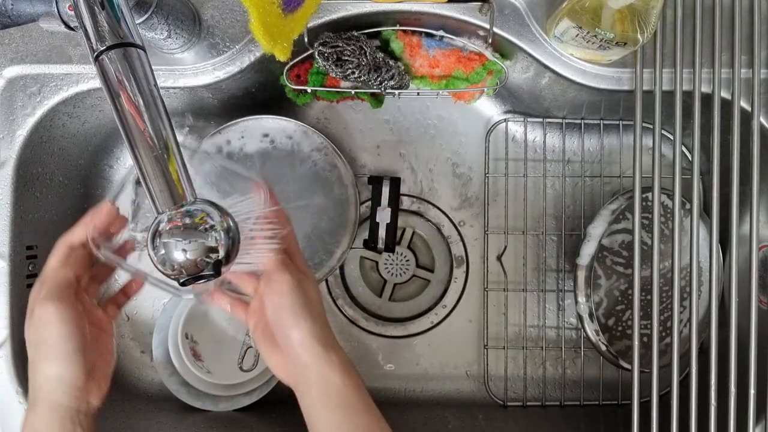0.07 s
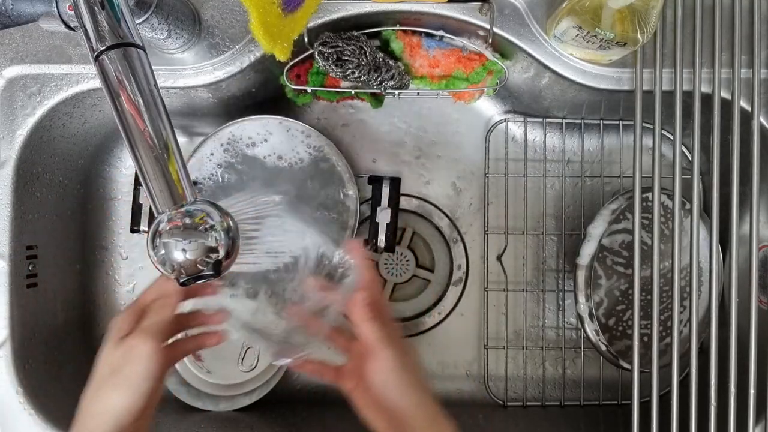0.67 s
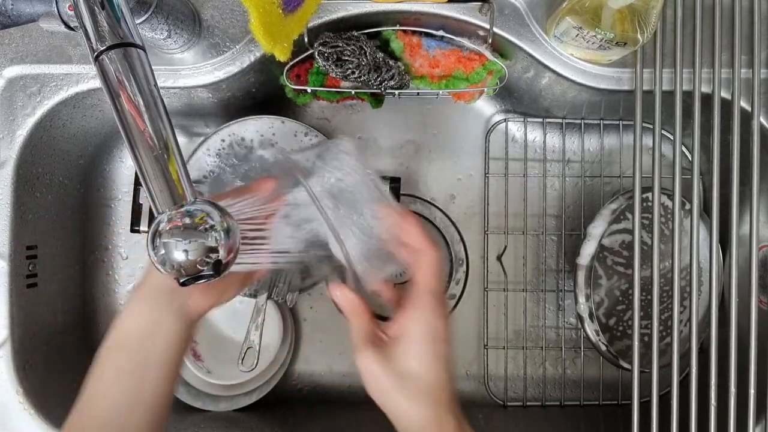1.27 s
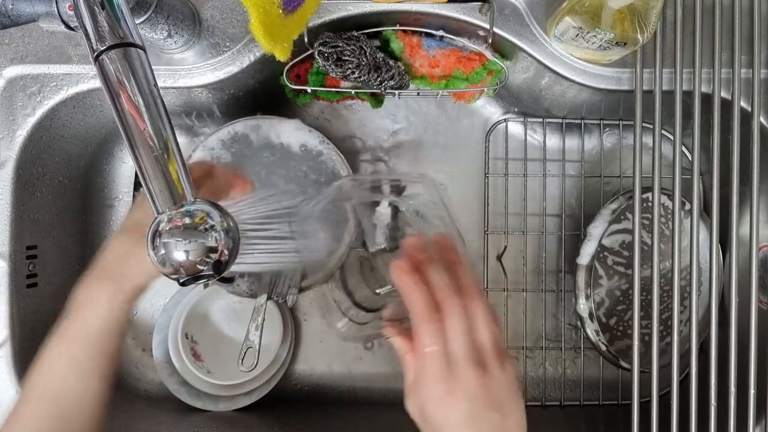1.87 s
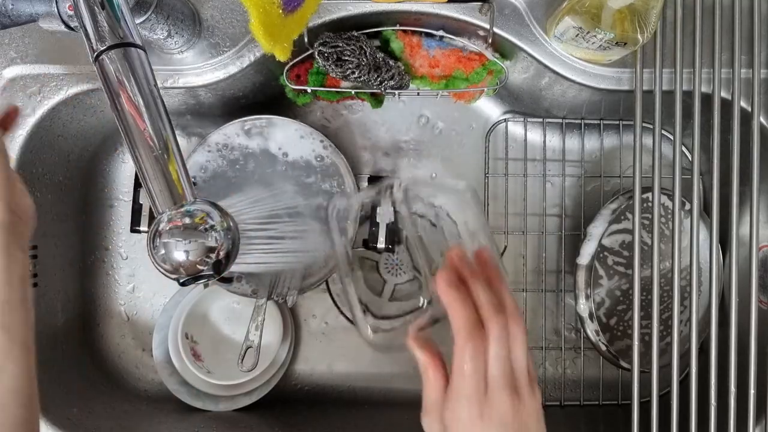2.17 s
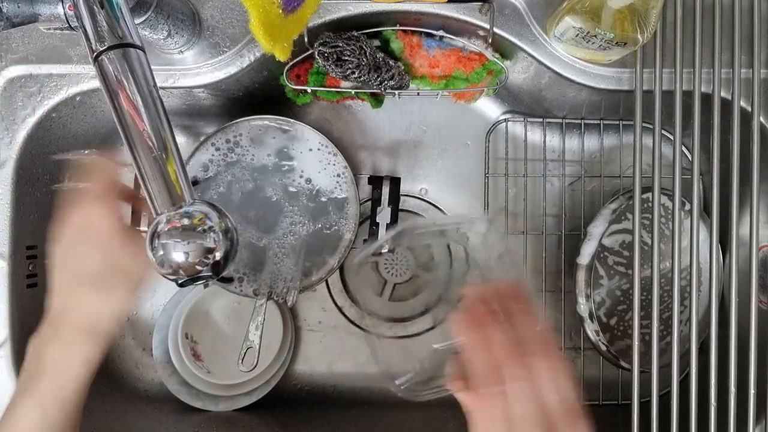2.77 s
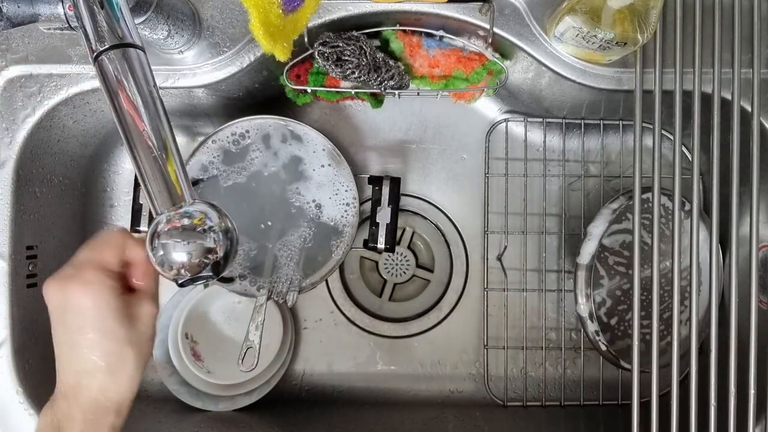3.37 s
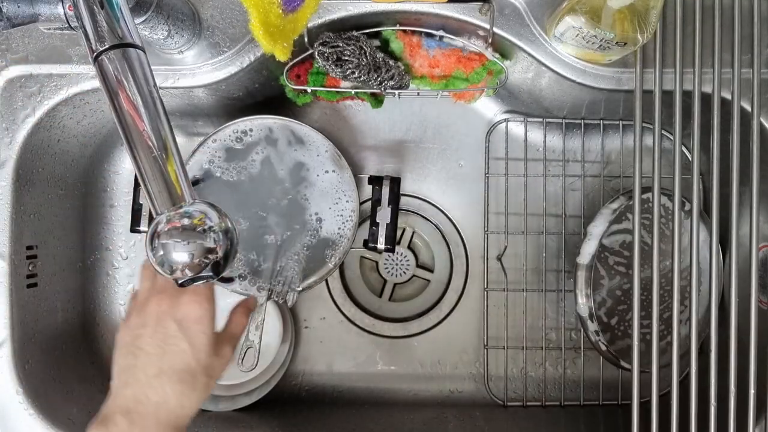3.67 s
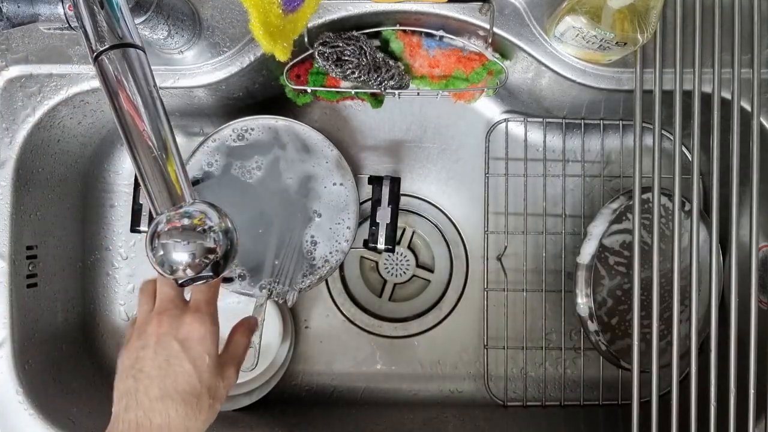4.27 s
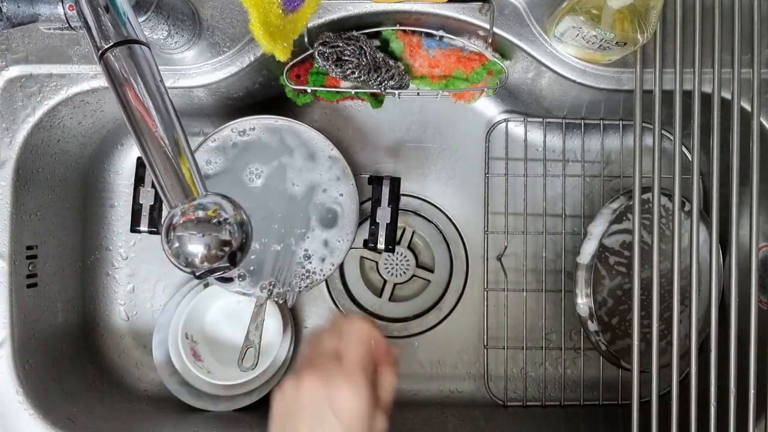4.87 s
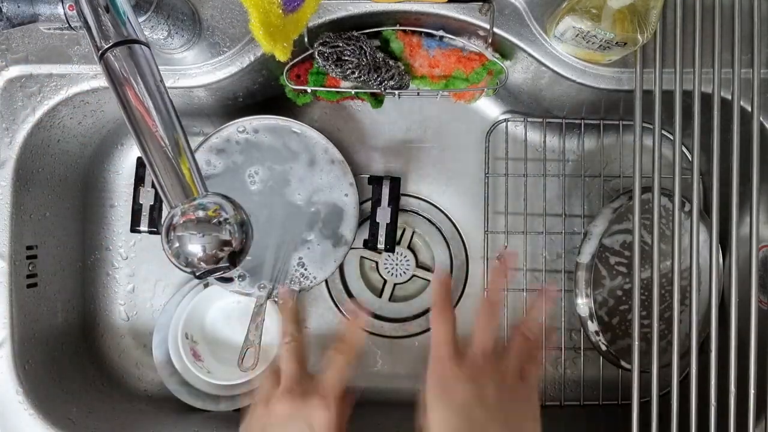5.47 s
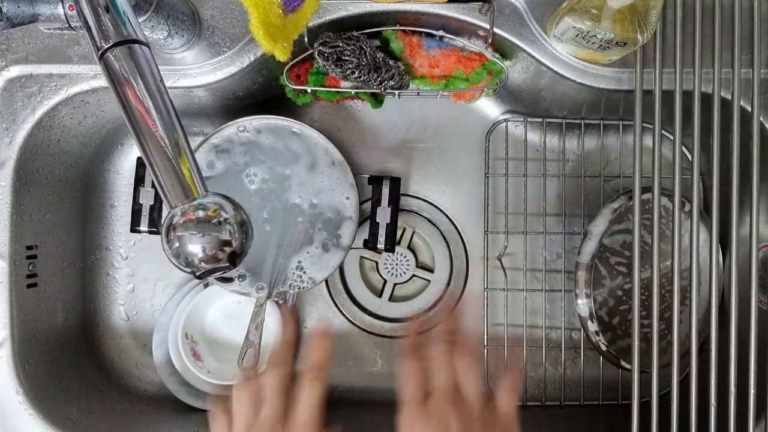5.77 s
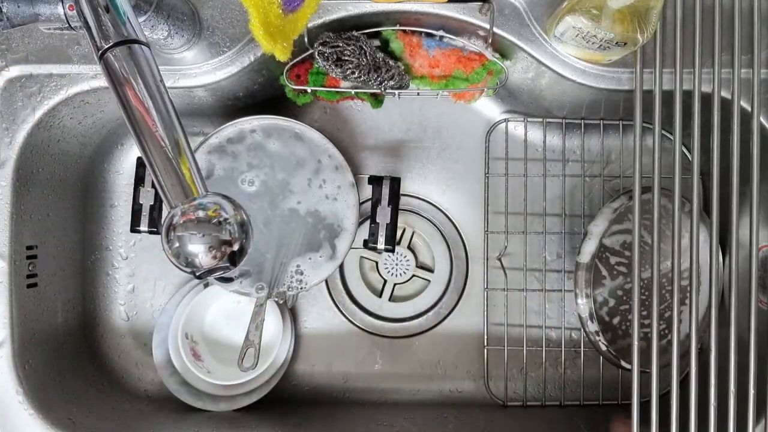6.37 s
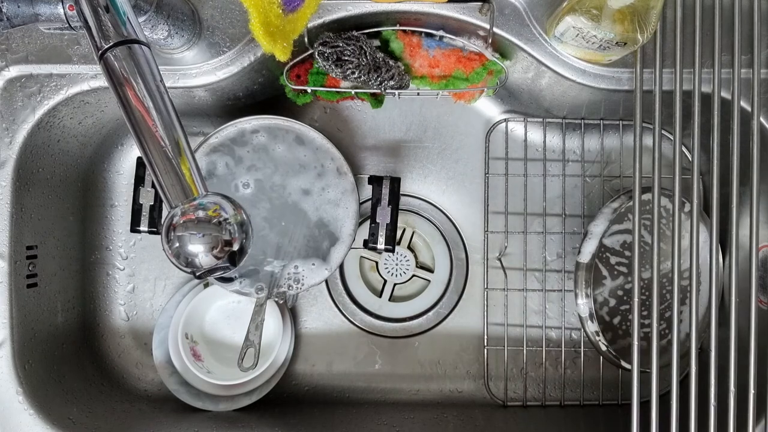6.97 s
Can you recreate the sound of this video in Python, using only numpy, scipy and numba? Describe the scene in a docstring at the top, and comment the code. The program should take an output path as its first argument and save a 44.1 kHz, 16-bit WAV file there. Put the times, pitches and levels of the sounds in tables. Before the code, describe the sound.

Water sprays over a plastic tub in a metal sink and stops; the faucet clunks and creaks, and faint drops fall.

```python
"""A spray tap rinses a plastic tub over a steel sink: jets hiss, drops patter, trapped air resonates.
The tub is moved clear, water slops out, and the jets churn ringing bubbles in a full bowl.
At 2.5 s the tap is shut and a trickle drains away. From 4.3 s the spout is swung aside: knocks excite
the modes of the steel and the joint groans by stick-slip friction. Wet hands are shaken over the basin,
a last drip falls and a hand bumps the microphone. The small kitchen reverberates and hums throughout."""
import sys
import numpy as np
from scipy import signal
from scipy.fft import rfft, irfft
from scipy.io import wavfile
from scipy.ndimage import uniform_filter1d
from numba import njit

SR = 44100
rng = np.random.default_rng(int(sys.argv[2]) if len(sys.argv) > 2 else 0)


def generate_wav(sig):
    """Save sig (samples, or channels by samples) to the path in sys.argv[1] as 16-bit PCM at SR."""
    pcm = np.round(np.clip(np.atleast_2d(sig).T, -1, 1) * 32767).astype(np.int16)
    wavfile.write(sys.argv[1], SR, pcm)


N = 318843
T = np.arange(N) / SR
CLEAR_S, SHUT_S, DRAINED_S = 1.89, 2.4555, 4.4  # tub clear of the spray, tap shut, bubbling over

# spectrum of drop impacts: (frequency [Hz], gain [dB])
PATTER_SPECTRUM = [(600, -16), (1200, -5), (1800, -4), (3300, -6), (4300, -11.5), (5500, -14), (7000, -12),
                   (12000, -41)]
# spectrum of clattering steel: (frequency [Hz], gain [dB])
CLATTER_SPECTRUM = [(50, -21), (120, -10.5), (190, -4.5), (250, -0.5), (320, -0.5), (570, 1), (660, -9.5),
                    (770, -0.5), (1050, -9), (1350, -6.5), (3300, -9.5), (5500, -18), (8000, -23.5),
                    (16000, -36)]


def running_water(open_hiss_db=-37.5, open_patter_db=-41.5, drum_db=-58.5):
    """Impact noise: dense random impulses merge into hiss; sparser drops patter and drum on the basin."""
    # the spray as the tub turns under it: (time [s], hiss level [dB], patter level [dB])
    spray = [(0.0, -43, -46.5), (0.136, -39, -49), (0.27, -43.5, -49.5), (0.456, -38, -43),
             (0.584, -41.5, -49.5), (0.664, -37, -40.5), (1.11, -39.5, -43), (1.226, -39.5, -40),
             (1.318, -42.5, -55), (1.408, -41, -42), (1.532, -46.5, -52), (1.562, -40, -44),
             (1.59, -39, -40)]
    # spectra of the jets and of the drumming basin: (frequency [Hz], gain [dB])
    hiss_spectrum = [(1500, -8), (4000, -2.5), (6000, -1.5), (7500, -1), (9500, 1), (11800, -1.5),
                     (12800, 4), (14500, 2.5), (16000, -1.5)]
    drum_spectrum = [(60, -14), (110, -8.5), (178, 11), (245, -6.5), (305, 9.5), (380, 4), (520, -7.5),
                     (660, -5.5), (1000, -2.5), (2500, -46)]
    # treble loss of a weak flow: (frequency [Hz], gain [dB])
    trickle_loss = [(3000, -0.5), (9000, -3), (15000, -8)]
    times, hiss_db, patter_db = np.transpose([*spray, (CLEAR_S, open_hiss_db, open_patter_db)])
    hiss = unit(colour(impacts(rate=7000, scatter_db=-2), hiss_spectrum)) * undb(1.7 * walk(45))
    drops = unit(colour(impacts(rate=1700, scatter_db=4.5, lag_s=.00008), PATTER_SPECTRUM))
    drops *= undb(1.2 * walk(35))
    when, pitch = rng.random((1500, 2)).T
    fizz = bubbles(when * DRAINED_S, 2100 * 2 ** (1.5 * pitch), cycles=50, scatter_db=3, glide=.2)
    patter = wall_echoes(drops + undb(-6) * fizz)
    drum = unit(basin(colour(impacts(rate=640, scatter_db=3.5), drum_spectrum)))
    jets = unit(hiss + undb(-1.5) * wall_echoes(hiss)) * undb(np.interp(T, times, hiss_db) - .1)
    landing = unit(basin(patter)) * undb(np.interp(T, times, patter_db) + 1.06)
    water = flow()
    jets = water * jets + (1 - water) * colour(jets, trickle_loss)
    drum_gain = np.hypot(undb(drum_db) * water, slopping()[0])
    # a weak flow lands softly: the patter falls away faster than the hiss
    return jets * water ** .71 + landing * water ** 1.2 + drum * drum_gain


def flow(shut_t60=.25, trickle_db=-25.5, trickle_t60=5.17):
    """Exponential decay in two stages: full flow drops fast at shut-off, leaving an uneven trickle."""
    since = np.maximum(T - SHUT_S, 0)
    trickle = undb(trickle_db + 3.5 * walk(9.2)) * fade(since, trickle_t60)
    return np.maximum(fade(since, shut_t60), trickle)


def slopping():
    """Transient excitation: slopping water drives the basin; gives the envelopes of drumming and boom."""
    # water leaving the tub: (time [s], duration [s], drumming level [dB], boom level [dB])
    slops = [(0.0, 0.18, -54.5, -91), (0.494, 0.14, -48, -80), (1.586, 0.079, -53.5, -44.5),
             (1.8, 0.09, -54, -45), (2.3, 0.021, -48.5, -44.5), (2.38, 0.1, -46.5, -38.5),
             (2.797, 0.061, -55, -69), (2.985, 0.016, -55, -55), (3.155, 0.13, -61, -66)]
    return sum(undb([[drum_db], [boom_db]]) * swell(s, length, attack_s=.017, t60=.45)
               for s, length, drum_db, boom_db in slops)


def churn(hollow_width_hz=170., bowl_db=-44, bowl_start_s=1.674, bowl_rise_s=.15):
    """Cavity resonance filters the ringing of entrained air, first in the tub, then in the bowl."""
    # bubbling in the tub until it is tipped out: (time [s], level [dB])
    tub_levels = [(0.0, -33.5), (.088, -42), (.19, -37.5), (.28, -28), (.38, -36), (.61, -44.5), (.75, -36),
                  (.88, -38.5), (1.02, -38), (1.11, -32.5), (1.27, -44), (1.31, -54.5), (1.55, -83.5)]
    # resonance of the air in the turning tub: (time [s], frequency [Hz])
    tub_resonance = [(0, 1140), (.1, 1097), (.22, 1030), (.32, 1002), (.45, 990), (.56, 1124), (.66, 1100),
                     (.75, 1010), (.86, 944), (1.0, 984), (1.12, 1030), (1.3, 984)]
    # resonances of the full bowl: (frequency [Hz], bandwidth [Hz], gain [dB])
    bowl_modes = [(865.4, 19, -3), (956, 92, -0.5), (1144, 37, 0.5), (1368, 45, 4), (1437, 63, -12)]
    when, pitch = rng.random((4200, 2)).T
    swarm = bubbles(when * DRAINED_S, 760 * 2 ** pitch, cycles=35, scatter_db=2, glide=.1, lag_s=.00007)
    centre = np.interp(T, *np.transpose(tub_resonance)) * (1 + .009 * walk(25))
    hollow = swarm
    for _ in range(2):  # two passes steepen the resonance
        hollow = np.array([moving_resonator(x, centre, hollow_width_hz) for x in hollow])
    bowl = unit(sum(undb(db) * resonator(swarm, hz, width) for hz, width, db in bowl_modes))
    in_tub = unit(hollow) + undb(-8) * unit(band(bowl, 860, "low"))
    in_tub *= undb(np.interp(T, *np.transpose(tub_levels)))
    gulps = undb(2 * walk(30)) * np.clip((T - bowl_start_s) / bowl_rise_s, 0, 1)
    return in_tub + undb(bowl_db) * bowl * gulps * flow() ** 1.6


def dribble():
    """Jet break-up: after shut-off the last water falls as small drops that ring bubbles in the bowl."""
    when, pitch = rng.random((420, 2)).T
    starts = SHUT_S + when ** 1.2 * (DRAINED_S - SHUT_S)
    drops = bubbles(starts, 1400 * 2 ** (2.3 * pitch), cycles=20, scatter_db=2.5, glide=.1)
    return undb(-51) * unit(basin(drops)) * flow()


def bubbles(start, hz, cycles, scatter_db, glide, lag_s=.00009):
    """Superposition of uneven bubbles, each decaying in about `cycles` periods; glide: octaves per t60."""
    size, life, side = np.clip(rng.standard_normal((len(start), 3)).T, -2.5, 2.5)
    t60 = cycles / hz * np.exp(.28 * life)
    return unit(ring_bubbles(start, hz, t60, undb(scatter_db * size), glide / t60, lag_s * side))


@njit
def ring_bubbles(start, hz, t60, size, rise, lag):
    """Damped oscillation: a bubble's pitch climbs as it nears the surface, where it bursts."""
    out = np.zeros((2, N))
    for k in range(len(start)):
        first, phase, life = int(start[k] * SR), 0., .6 * t60[k]
        for i in range(max(0, min(int(life * SR), N - first))):
            t = i / SR
            omega = 2 * np.pi * min(hz[k] * 2 ** (rise[k] * t), .45 * SR)
            phase += omega / SR
            amplitude = size[k] * np.exp(-6.9 * t / t60[k]) * min(phase / 14, 1.) * (1 - (t / life) ** 6)
            out[0, first + i] += amplitude * np.sin(phase + omega * lag[k] / 2)
            out[1, first + i] += amplitude * np.sin(phase - omega * lag[k] / 2)
    return out


def knocks(build_s=.0051, contact_s=.0012):
    """Impulse response: a crack and clack at contact, then modes and dense clatter build up."""
    # blows of tub, lever and spout, then two handling knocks on the microphone, in relative levels:
    # (time [s], click level [dB], thud level [dB], ring level [dB], click t60 [s])
    blows = [(2.401, -19, -36, -35, 0.08), (2.458, -28, -40, -44.5, 0.045), (2.6396, -42, -62, -52, 0.086),
             (4.328, -15.5, -17.5, -20.5, 0.11), (4.611, -36, -39, -57, 0.1), (4.644, -50, -38, -70, 0.07),
             (4.6749, -39.5, -47, -48, 0.58), (4.7769, -18.5, -27, -29.5, 0.088),
             (4.8117, -32, -28.5, -42, 0.43), (4.883, -36, -33, -37.5, 0.1), (4.904, -32, -40, -33.5, .14),
             (4.9398, -30, -53, -35, 0.064), (5.257, -62, -55.5, -54.5, 0.095),
             (7.1204, -41.5, -43, -59.5, 1), (7.21, -26.5, -36, -46, 0.44)]
    out, t, onset_samples = np.zeros((2, N)), T[:SR // 2], SR // 25
    for s, click_db, thud_db, ring_db, t60 in blows:
        clatter = unit(colour(noise(width=.73, size=len(t)), CLATTER_SPECTRUM))
        body = (steel_ring(t) + undb(-1) * clatter * fade(t, .16)) * attack(t, build_s)
        rattle = undb(3.5 * walk(220)[:len(t)])  # loose parts chatter after the blow
        crack = clatter * (fade(t, .005) + undb(-11.5) * rattle * fade(t, t60))
        strike = (crack + undb(-12) * clack(t, min(t60, .05))) * attack(t, contact_s)
        parts = [(band(body, 316, "low"), thud_db - 8),
                 (band(body, [260, 1300], "band"), ring_db),
                 (band(strike + undb(-28) * body, 1000, "high"), click_db - 19.5)]
        add(out, s, sum(x * undb(db) / np.std(x[:, :onset_samples].mean(0)) for x, db in parts))
    return out


def steel_ring(t):
    """Modal superposition: each blow weights the modes anew; they reach the two sides out of phase."""
    # modes of the tap on its steel deck: (frequency [Hz], level [dB], t60 [s])
    modes = [(97.7, -4.5, 0.26), (173.2, 1.5, 0.081), (234.3, -11, 0.17), (327.5, -1, 0.055),
             (391, -5.5, 0.15), (426, -8, 0.075), (471, -2, 0.092), (569.4, -11, 0.27), (769, -13.5, .22),
             (781, -6.5, 0.059), (879, -6.5, 0.2), (1030, -6, 0.097), (1172, -14, 0.18), (1841, -17.5, .2),
             (2278, -17, .18)]
    out = 0
    for (hz, db, t60), (size, phase, side, detune) in zip(modes, rng.standard_normal((len(modes), 4))):
        angle = np.pi * phase + .06 * np.sign(side) * min(hz / 330, 1.3) * np.array([[1], [-1]])
        pitch = hz * (1 + .007 * detune)  # the hand's grip shifts the modes
        out = out + undb(db + size) * fade(t, t60) * np.sin(2 * np.pi * pitch * t + angle)
    return out


def clack(t, t60, count=36):
    """Point excitation: each contact wakes its own set of short, high, inharmonic partials."""
    pitch, size, left, right = rng.random((count, 4)).T[:, :, None, None]
    hz = 1900 * 3.2 ** pitch
    angle = 2 * np.pi * np.concatenate([left, right], axis=1)
    return unit(np.sum(size / hz * np.sin(2 * np.pi * hz * t + angle), axis=0)) * fade(t, t60)


def thumps(rise_s=.0042):
    """Damped resonance: a soft, heavy blow swells into a single decaying mode."""
    # water, tub or hand bearing on basin and tap: (time [s], peak level [dB], frequency [Hz], t60 [s])
    blows = [(1.603, -35.5, 339, .1), (1.657, -31.5, 336, .08), (1.81, -37, 158, .28),
             (2.053, -42, 164, .32), (2.389, -22.5, 110, .12), (4.329, -14.5, 187, 0.046),
             (4.3314, -13.5, 422, .045), (4.336, -18, 918, .045), (4.643, -28.5, 50.4, 0.25),
             (4.7775, -19, 354, 0.027)]
    out, t = np.zeros((2, N)), T[:SR // 2]
    for s, db, hz, t60 in blows:
        shape = (1 - np.exp(-(t / rise_s) ** 2)) * fade(t, t60)
        add(out, s, undb(db) * (shape / shape.max() * np.sin(2 * np.pi * hz * t))[None])
    return out


def ticks():
    """Brief contacts have broad spectra: bright ticks, and the free ringing of the spout's collar."""
    # the joint, and drops on bare steel: (time [s], relative level [dB], frequency [Hz], t60 [s])
    contacts = [(2.642, -37.5, 1960, 0.025), (3.56, -35, 5350, .025), (3.676, -31, 4700, 0.019),
                (4.061, -48, 5000, 0.037), (4.329, -32, 11000, .14), (4.33, -15.5, 2296, .025),
                (4.777, -13, 3200, 0.015), (4.884, -28, 5900, 0.02), (4.8985, -32, 6000, 0.0086),
                (4.9315, -30, 5200, 0.013), (4.944, -37, 4800, 0.014)]
    # blows on the collar: (time [s], level [dB])
    jangles = [(4.803, -39), (4.815, -39.5)]
    # its modes: (frequency [Hz], gain [dB], t60 [s])
    collar_modes = [(2110, -4, .09), (2998, 1, 0.079), (3300, -13, 0.068), (3480, 1.5, .06),
                    (3800, -15, .06), (3900, -3, .05)]
    out, t = np.zeros((2, N)), T[:SR // 4]
    for s, db, hz, t60 in contacts:
        burst = noise(width=1, size=len(t))
        tick = unit(band(burst, [hz / 1.3, hz * 1.3], "band")) + undb(-9) * unit(band(burst, hz, "high"))
        add(out, s, undb(db - 15) * tick * fade(t, t60))
    for s, db in jangles:
        for (hz, mode_db, t60), phase in zip(collar_modes, rng.random((len(collar_modes), 2, 1))):
            add(out, s, undb(db + mode_db) * fade(t, t60) * np.sin(2 * np.pi * (hz * t + phase)))
    return out


def swivel(attack_s=.018):
    """Stick-slip friction: the spout groans unsteadily in its joint, scrapes and rattles its collar."""
    # turns of the spout: (time [s], duration [s], groan frequency [Hz], groan level [dB],
    # scrape level [dB], rattle level [dB])
    strokes = [(4.446, 0.03, 402, -46, -53.5, -79), (4.489, 0.027, 397.5, -40, -51, -76),
               (4.52, 0.056, 400, -56, -52.5, -62), (4.578, 0.011, 343, -36.5, -52, -72),
               (4.601, 0.024, 352, -58, -42.5, -54), (4.667, 0.02, 398, -53, -49, -61),
               (4.791, 0.028, 355, -37, -29.5, -41.5), (4.878, 0.035, 349, -33.5, -39, -48.5),
               (4.933, 0.017, 473, -29.5, -37.5, -72)]
    # spectrum of the loose collar: (frequency [Hz], gain [dB])
    collar_spectrum = [(900, -23), (1350, 19), (2160, 12.5), (2550, 2), (3000, 3), (3200, -12), (3420, 0),
                       (3800, -3), (6000, -7), (16000, -54)]
    # its resonances: (frequency [Hz], bandwidth [Hz])
    collar_modes = [(2160, 120), (2500, 190), (3000, 150), (3420, 200), (4690, 340)]
    scrape = unit(band(colour(impacts(rate=900, scatter_db=2), CLATTER_SPECTRUM), [270, 1400], "band"))
    chatter = unit(colour(impacts(rate=420, scatter_db=3.5), collar_spectrum))
    ring = sum(resonator(chatter, hz, width) for hz, width in collar_modes)
    rattle = unit(.7 * chatter + unit(ring))
    wavering_time = np.cumsum(1 + .016 * walk(90)) / SR
    flutter = undb(2 * walk(110))
    out = 0
    for s, length, hz, groan_db, scrape_db, rattle_db in strokes:
        groan = undb(groan_db) * flutter * np.sqrt(2) * np.sin(2 * np.pi * hz * wavering_time)
        rubbing = undb(scrape_db) * scrape + undb(rattle_db) * rattle
        out = out + groan * swell(s, length, attack_s, t60=.12)
        out = out + rubbing * swell(s, length, attack_s, t60=.23)
    return out


def splashes():
    """Impact noise of flung water: a clumped shower swells and thins out, and some drops ring bubbles."""
    # from tub, spout and hands: (time [s], rise time [s], relative spatter [dB], relative splat [dB])
    showers = [(1.608, 0.012, -21.5, -44), (2.584, 0.01, -48.5, -60), (2.8114, 0.011, -70, -85),
               (3.151, .018, -42.5, -76), (3.204, .018, -46.5, -64), (3.5565, 0.011, -45.5, -63.5),
               (3.583, .009, -70, -78), (3.671, 0.012, -46, -63), (4.278, 0.049, -57, -64),
               (5.191, 0.01, -39, -67.5), (5.238, 0.017, -53, -66), (5.251, 0.01, -59, -64),
               (5.494, 0.015, -52, -76.5), (5.548, 0.0078, -49.5, -72), (5.565, 0.018, -71, -70),
               (5.738, 0.013, -51.5, -74), (5.792, 0.017, -53.5, -68.5), (5.985, .022, -55, -75),
               (6.047, 0.016, -60, -75), (6.234, 0.015, -48.5, -80), (6.285, 0.032, -64, -79.5),
               (6.435, 0.011, -55.5, -84), (6.476, 0.013, -51, -78)]
    # spectrum of fine drops on steel: (frequency [Hz], gain [dB])
    spatter_spectrum = [(1500, -4.5), (4000, -1.5), (6000, 2), (8500, 6.5), (11500, 2), (13500, 5),
                        (16000, 2.5)]
    spatter, splat, wetted = np.zeros((3, 1, N))
    t = T[None, :SR // 2]
    for s, peak_s, spatter_db, splat_db in showers:
        shower = (t / peak_s * np.exp(1 - t / peak_s)) ** 1.5
        add(spatter, s, undb(spatter_db) * shower)
        add(splat, s, undb(splat_db) * shower)
        add(wetted, s, undb(splat_db) * fade(t, .15) * attack(t, peak_s))
    fine = unit(wall_echoes(colour(impacts(rate=4200, scatter_db=3), spatter_spectrum)))
    fine *= undb(1.5 * walk(180))  # clumping
    coarse = unit(basin(colour(impacts(rate=2600, scatter_db=2.5), PATTER_SPECTRUM)))
    when, pitch = rng.random((1100, 2)).T
    plinks = bubbles(when * T[-1], 1400 * 2 ** (1.8 * pitch), cycles=60, scatter_db=3, glide=.15)
    return undb(-11) * fine * spatter + undb(6) * coarse * splat + undb(-10) * plinks * wetted


def pats(rise_s=.00553, t60=.076):
    """Inelastic impact: a fat drop flattens on wet steel with a short burst of narrow-band noise."""
    # fat drops and wet fingers: (time [s], level [dB], frequency [Hz])
    landings = [(1.613, -17.5, 5100), (1.614, -25.5, 2500), (1.913, -28, 4550), (3.681, -46, 3160),
                (3.757, -58, 3930), (3.837, -57.5, 1470), (3.586, -49, 1770), (4.612, -49, 4150),
                (4.626, -41.5, 2450), (4.643, -55, 5700), (4.676, -52, 5700), (4.68, -54, 7500),
                (5.423, -60.5, 1830), (5.497, -62, 2130), (5.742, -54, 5740), (5.776, -51.5, 2100),
                (6.021, -52, 2080), (6.426, -59.5, 2230), (6.61, -59, 13000)]
    out, t = np.zeros((2, N)), T[:SR // 4]
    for s, db, hz in landings:
        hiss = band(noise(width=.7, size=len(t)), [hz / 1.14, hz * 1.14], "band")
        add(out, s, undb(db) * unit(hiss) * attack(t, rise_s) * fade(t, t60))
    return out


def drips(echo_s=.013, echo_db=-11, tick_db=-25):
    """Bubble resonance: a lone drop ticks and traps air, whose plink reflects off the sink wall."""
    # trapped bubbles: (time [s], level [dB], frequency [Hz], t60 [s], pitch rise [octaves/s])
    trapped = [(1.686, -29.5, 1015, 0.068, 1.2), (1.701, -29, 1685, 0.083, 2.2),
               (2.665, -38, 3190, 0.014, 2), (2.83, -54, 3090, .03, 2), (2.919, -44, 4210, 0.018, 5),
               (2.934, -50.5, 980, 0.1, 1.2), (2.964, -54, 2200, 0.056, 1), (2.993, -53, 1750, .045, 1),
               (3.1224, -55, 1330, .035, 2), (3.21, -54, 1860, 0.022, 2), (3.584, -25.5, 1220, 0.014, 0.43),
               (3.5941, -37.5, 1119, .085, 1.57), (3.677, -36, 3120, 0.022, 4), (3.704, -53, 1175, 0.05, 1),
               (3.788, -53, 1760, 0.03, 5.7), (3.804, -43, 2920, 0.025, 3),
               (3.9913, -65.5, 3210, .07, 0.89), (4.1883, -60.5, 3120, .03, 2),
               (6.6081, -31, 886, 0.12, 12.8)]
    s, db, hz, t60, rise = np.array(trapped, float).T.copy()
    plinks = ring_bubbles(s, hz, t60, undb(db), rise, .0001 * rng.standard_normal(len(s)))
    rocked = T + .00007 * walk(170)  # the rocking surface shakes the bubble's pitch and strength
    plinks = np.array([np.interp(rocked, T, x) for x in plinks]) * undb(2.4 * walk(260))
    out, t = room(plinks, t60=.1, wet_db=-8), T[:SR // 10]
    add(out, echo_s, undb(echo_db) * plinks)
    for start, gain in zip(s, undb(db + tick_db)):
        tick = unit(colour(noise(width=1, size=len(t)), PATTER_SPECTRUM))
        add(out, start, gain * tick * attack(t, .001) * fade(t, .035))
    return out


def foam():
    """Small bubbles resonate high: tiny ones ring faintly and burst at random times."""
    when, pitch = rng.random((260, 2)).T
    hz = 1400 * 2 ** (2.5 * pitch)
    return undb(-87.5) * bubbles(when * T[-1], hz, cycles=20, scatter_db=3.5, glide=.15)


def boom(running_db=-62):
    """Structure-borne sound: water and pushes make the sink boom; handling noise rumbles at the end."""
    # pushes on tap or sink, then two handling bumps on the microphone: (time [s], level [dB])
    bumps = [(2.546, -48), (4.47, -44), (4.558, -39.5), (4.637, -37), (4.945, -41.5), (7.123, -43),
             (7.205, -42)]
    # spectrum of the rumble: (frequency [Hz], gain [dB])
    rumble_spectrum = [(20, -47.5), (38, -25.5), (54, 1), (75, -3.5), (108, 9), (150, -5), (230, -18.5),
                       (600, -54)]
    bumped = sum(undb(db) * swell(s, length_s=.016, attack_s=.0015, t60=.66) for s, db in bumps)
    rumble = unit(colour(noise(width=.027), rumble_spectrum))
    return rumble * (undb(running_db) * flow() + slopping()[1] + bumped)


def basin(x):
    """Cavity resonance: the hollow of the sink adds its air modes to whatever sounds inside."""
    # air modes: (frequency [Hz], bandwidth [Hz], gain over the direct sound [dB])
    air_modes = [(543, 60, 10), (860, 18, 10.5), (1013, 19, 1.5), (1300, 11, 6), (2270, 22, -9),
                 (2210, 48, -5.5), (3225, 90, 2.5), (3640, 110, 1.5), (4030, 48, 6.5), (4500, 140, -2),
                 (5000, 510, -2.5), (5390, 1400, -1), (5490, 49, 7.5)]
    t = T[:SR // 4]
    response = sum(undb(db) * 2 * np.pi * width / SR * np.exp(-np.pi * width * t)
                   * np.cos(2 * np.pi * hz * t) for hz, width, db in air_modes)
    return x + convolve(x, response)


def wall_echoes(x, count=7):
    """Comb filtering: short echoes off tub and basin shift as the water lands elsewhere."""
    out, index = x, np.arange(N)
    for delay_s in np.linspace(.0012, .0085, count):
        delayed = index - SR * (delay_s + .00013 * walk(3))
        out = out + .55 * walk(7) * np.array([np.interp(delayed, index, side) for side in x])
    # levelled, so that the colour changes more than the loudness
    return out / np.sqrt(uniform_filter1d(out.mean(0) ** 2, SR // 12) + 1e-12)


def at_tap(x, lead_s=.0003, left_minus_right_db=-.1):
    """Arrival-time difference: sound from the tap reaches the left side first."""
    late = np.pad(x[1], (round(lead_s * SR), 0))[:N]
    return np.array([x[0], late]) * undb(np.array([[1], [-1]]) * left_minus_right_db / 2)


def room(x, t60=.23, wet_db=-9):
    """Reverberation: hard kitchen walls return a short diffuse tail, its bass alike on both sides."""
    t = T[:SR // 2]
    echoes = rng.standard_normal((2, len(t))) * attack(t, .0017)
    tail = band(echoes[:1], 1200, "low") + band(echoes, [1100, 5000], "band") + band(echoes, 4800, "high")
    tail *= fade(t, t60)
    return x + undb(wet_db) * convolve(x, tail / np.sqrt(np.sum(tail[0] ** 2)))


def kitchen(air_db=-61.5, hum_width_hz=25):
    """Ambient noise: a low rumble, a faint wide hiss and the narrow-band hum of an appliance."""
    # spectrum of the background: (frequency [Hz], gain [dB])
    air_spectrum = [(15, -42), (25, -43), (43, -7.5), (92, -2.5), (190, -16), (212, -23.5), (277, -13),
                    (405, -14), (560, -12), (624, -24.5), (695, -14), (1520, -52), (2280, -49.5),
                    (3340, -44.5), (16000, -43.5)]
    # tones of the appliance: (frequency [Hz], relative level [dB])
    hum_tones = [(247.6, -85.5), (387.6, -83), (559.9, -67.5), (759.0, -75.5), (899.0, -76.5), (1895, -84),
                 (2250, -99), (2455, -104.5)]
    air = band(noise(width=.08), 530, "low") + band(noise(width=1), 1100, "high")
    hum = sum(undb(db) * unit(resonator(air, hz, hum_width_hz)) for hz, db in hum_tones)
    return undb(air_db) * unit(colour(air, air_spectrum)) * undb(.67 * walk(13)) + undb(-6) * hum


def impacts(rate, scatter_db, lag_s=.00013):
    """Shot noise: `rate` uneven clicks a second, each with its own lag between the two sides."""
    chance, size, side = rng.random(N), rng.standard_normal(N), rng.standard_normal(N)
    left = np.flatnonzero(chance < rate / SR)
    force = (rng.choice([-1, 1], N) * undb(scatter_db * np.minimum(size, 2.8)))[left]
    right = np.clip(left + np.round(side[left] * lag_s * SR).astype(int), 0, N - 1)
    return np.array([np.bincount(left, force, N), np.bincount(right, force, N)])


def noise(width, size=N):
    """Partly coherent stereo noise; width is the ratio of side to middle."""
    mid, side = rng.standard_normal((2, size))
    return mid + width * np.array([side, -side])


def walk(rate):
    """Random modulation: `rate` values a second, interpolated, with a spread near 1."""
    return 1.2 * np.interp(T * rate, np.arange(2048), rng.standard_normal(2048))


def attack(t, rise_s):
    """Exponential approach to 1."""
    return 1 - np.exp(-t / rise_s)


def fade(t, t60):
    """Exponential decay by 60 dB in t60 seconds."""
    return np.exp(-np.log(1000) * t / max(t60, 1e-3))


def swell(s, length_s, attack_s, t60):
    """Envelope from time s: linear attack, hold, exponential release."""
    return np.clip((T - s) / attack_s, 0, 1) * fade(np.maximum(T - s - length_s, 0), t60)


def resonator(x, hz, width):
    """Second-order resonance; centre and bandwidth in Hz."""
    return signal.lfilter(*signal.iirpeak(hz, hz / width, fs=SR), x)


@njit
def moving_resonator(x, hz, width):
    """Time-varying resonance: a state-variable band-pass whose centre follows hz."""
    out, band_state, low_state = np.empty(len(x)), 0., 0.
    for i in range(len(x)):
        step, damping = np.tan(np.pi * hz[i] / SR), width / hz[i]
        velocity = (band_state + step * (x[i] - low_state)) / (1 + step * (step + damping))
        band_state = 2 * velocity - band_state
        low_state += 2 * step * velocity
        out[i] = damping * velocity
    return out


def colour(x, points, size=4096):
    """Minimum-phase filtering through points of (frequency [Hz], gain [dB])."""
    hz, db = np.transpose(points)
    bins_hz = np.maximum(np.fft.rfftfreq(size, 1 / SR), 1)
    cepstrum = irfft(np.log(undb(np.interp(np.log(bins_hz), np.log(hz), db))))
    cepstrum[1:size // 2] *= 2  # folding the cepstrum makes the response causal
    cepstrum[size // 2 + 1:] = 0
    return convolve(x, irfft(np.exp(rfft(cepstrum))))


def band(x, edges_hz, kind):
    """Maximally flat low-, high- or band-pass filtering."""
    return signal.sosfilt(signal.butter(3, edges_hz, kind, fs=SR, output="sos"), x)


def convolve(x, response):
    """Convolution with an impulse response, keeping the length."""
    return signal.fftconvolve(x, np.atleast_2d(response), axes=1)[:, :x.shape[1]]


def add(out, s, x):
    """Superposition of a short sound at time s."""
    i = max(int(s * SR), 0)
    out[:, i:i + x.shape[1]] += x[:, :max(N - i, 0)]


def unit(x):
    """Normalisation of a stereo pair so that its middle has rms 1."""
    return x / np.sqrt(np.mean(x.mean(0) ** 2) + 1e-30)


def undb(db):
    """Level in decibels to amplitude ratio."""
    return 10 ** (np.asarray(db) / 20)


def scene():
    """Superposition: water and contacts reverberate in the kitchen, over the boom and the background."""
    water = running_water() + churn() + dribble()
    contacts = at_tap(knocks() + thumps() + ticks() + swivel())
    drops = splashes() + pats() + drips() + foam()
    return room(water + contacts + drops) + boom() + kitchen()


def record(dry, top_hz=15950):
    """Frequency response: each microphone has its own colour, and a steep low-pass limits the band."""
    # channel balance: (frequency [Hz], left minus right [dB])
    balance = [(100, 2), (700, 0.5), (1400, -0.1), (2800, 1.5), (5500, 1), (9500, 0.5), (13500, -2)]
    pair = np.vstack([colour(x[None], [(hz, side * db / 2) for hz, db in balance])
                      for x, side in zip(dry, (1, -1))])
    return signal.sosfilt(signal.ellip(10, .2, 80, top_hz, fs=SR, output="sos"), pair)


dry = scene()
out = record(dry)
generate_wav(out)
```